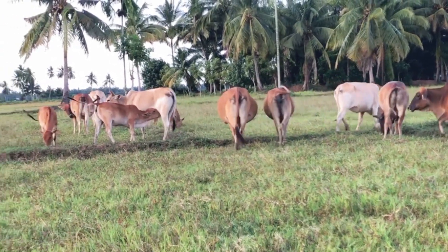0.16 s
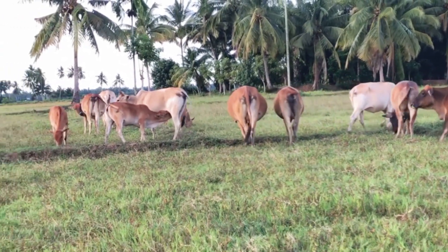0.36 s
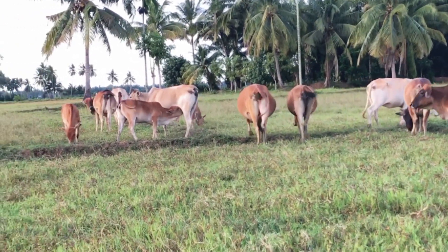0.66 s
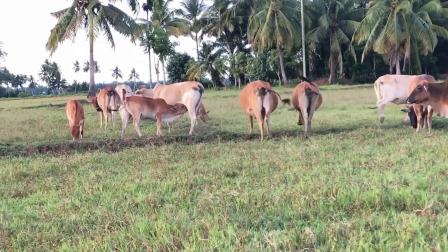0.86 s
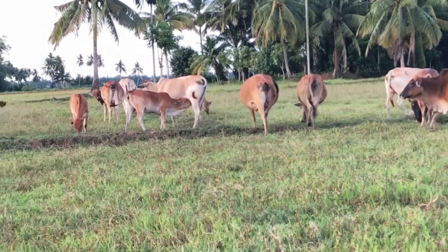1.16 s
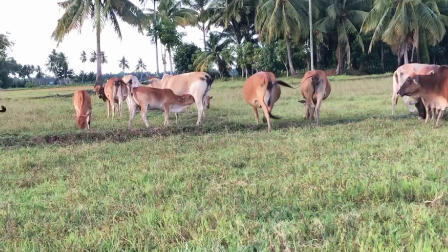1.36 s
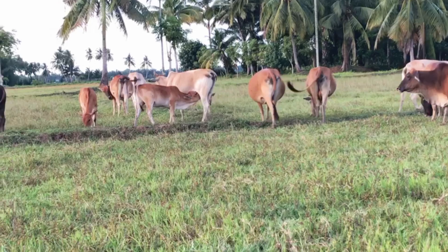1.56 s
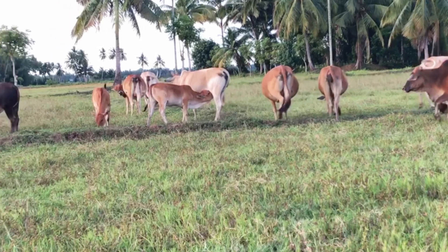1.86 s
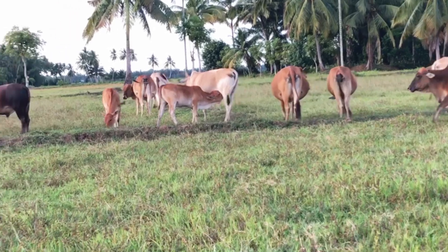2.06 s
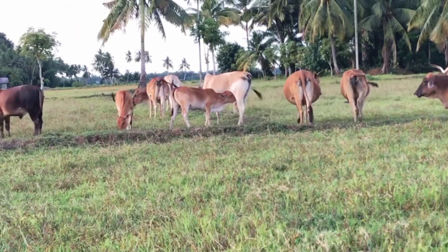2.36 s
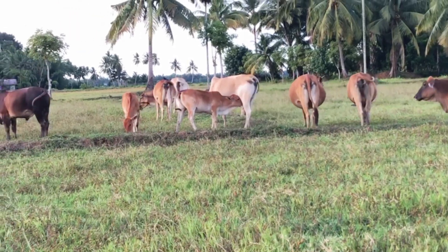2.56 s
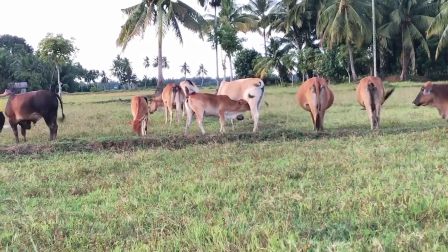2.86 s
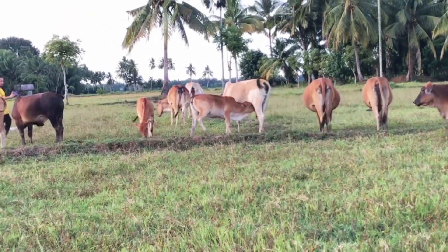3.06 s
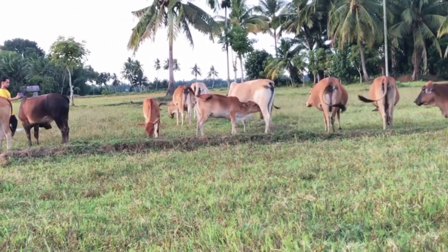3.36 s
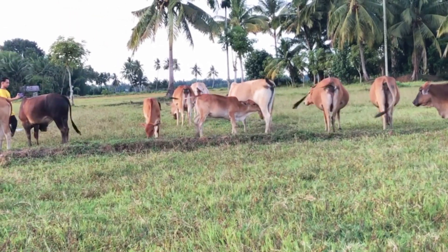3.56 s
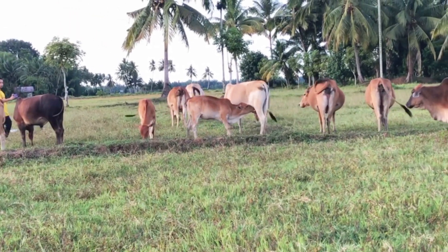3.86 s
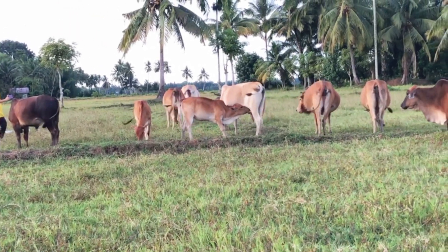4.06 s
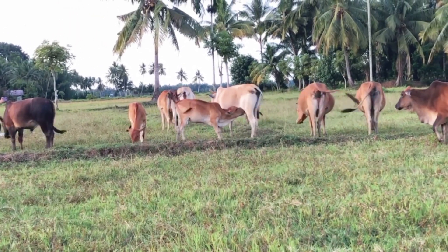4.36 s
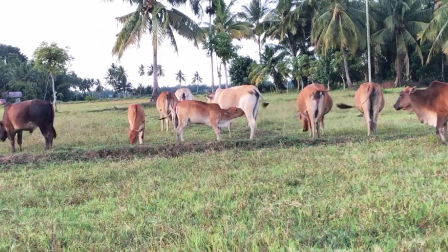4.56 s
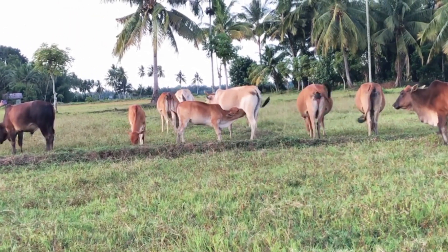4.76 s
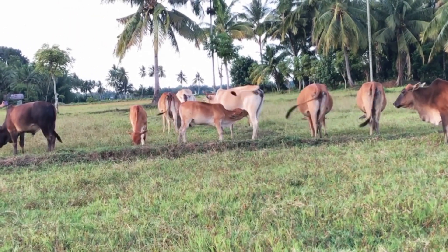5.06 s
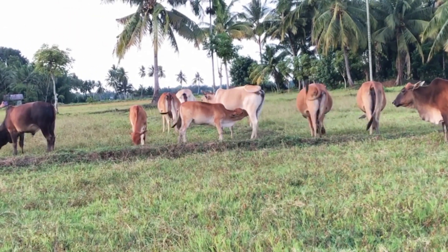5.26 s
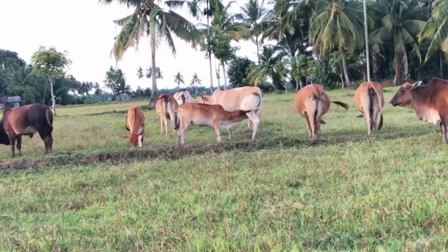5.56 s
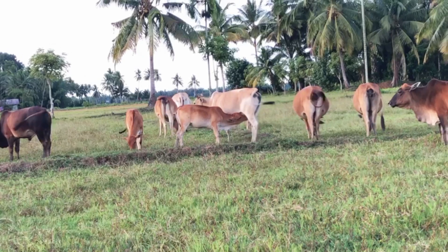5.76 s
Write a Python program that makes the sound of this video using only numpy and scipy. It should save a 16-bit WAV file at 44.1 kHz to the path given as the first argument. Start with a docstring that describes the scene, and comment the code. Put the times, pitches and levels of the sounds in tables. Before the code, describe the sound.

Outdoors, two calf bawls frame a low ragged cow moo, with wind thumping the microphone and bright birds chirping rapidly near the end.

```python
"""Cattle on an open pasture: a rough moo dies away, a calf bawls twice and a cow answers between the calls.
Each call is a train of vocal-fold pulses ringing the throat; it turns hoarse as the pitch sags, and a tail of
fading noise echoes it. A short low comes from far off. A far bird repeats a warble; other notes, faint and far
or loud and close, are whistles, trills and buzzes, all made of gliding sines. Filtered noise and clicks make
the wind that buffets the microphone, over a soft hiss of filtered noise."""
import sys
import numpy as np
from scipy import signal
from scipy.fft import rfft, irfft
from scipy.io import wavfile
from scipy.ndimage import uniform_filter1d, map_coordinates

SR = 44100
rng = np.random.default_rng(int(sys.argv[2]) if len(sys.argv) > 2 else 0)


def store_pcm(level_fs):
    """Save levels as 16-bit WAV."""
    pcm = np.round(np.clip(level_fs, -1, 1) * 32767).astype(np.int16)
    wavfile.write(sys.argv[1], SR, np.atleast_2d(pcm).T)


N = 260190
T = np.arange(N) / SR  # time in s
FREQS = np.arange(N + 1) * SR / (2 * N)  # filter frequencies in Hz


def undb(db):
    """Turn decibels into gain."""
    return 10 ** (np.asarray(db) / 20)


def curves(table):
    """Turn a table into curves over time: the first column is the time, each other column a curve."""
    seconds, *columns = np.transpose(table)
    return [np.interp(T, seconds, column) for column in columns]


def unit(x):
    """Scale to an rms (average strength) of 1."""
    return x / np.sqrt(np.mean(x ** 2))


def steady(x, seconds=0.023):
    """Even out the loudness by holding the running rms near 1."""
    running_power = np.abs(uniform_filter1d(x ** 2, int(seconds * SR)))
    return x / np.sqrt(running_power + 1e-6 * np.mean(x ** 2))


def ease(share):
    """A smooth step from 0 to 1."""
    return np.sin(np.pi / 2 * np.clip(share, 0, 1)) ** 2


def gate(start, end, edge):
    """Open from start to end (s), with soft edges."""
    opening = np.clip((T - start) / edge + .5, 0, 1)
    closing = np.clip((end - T) / edge + .5, 0, 1)
    return opening * closing


def walk(rate):
    """Random wandering with a spread near 1, drawn as straight lines between `rate` random points per second."""
    knots = rng.standard_normal(int(N / SR * rate) + 2)
    return np.sqrt(3 / 2) * np.interp(T * rate, np.arange(len(knots)), knots)


def filtered(x, response):
    """Apply a frequency response."""
    return irfft(rfft(x, 2 * N) * response)[:N]


def colour(points):
    """A filter through (Hz, dB) points that rings only after its input, never before."""
    hz, db = np.transpose(points)
    gain = undb(np.interp(np.log(FREQS + 1), np.log(hz), db))
    # folding the cepstrum gives the minimum-phase filter
    cepstrum = irfft(np.log(gain))
    cepstrum[1:N] *= 2
    return np.exp(rfft(cepstrum[:N], 2 * N))


def clicks(times, sizes):
    """Very short clicks placed exactly, even between samples, by a windowed sinc."""
    out = np.zeros(N)
    at = np.asarray(times)[:, None] * SR
    taps = np.floor(at).astype(int) + np.arange(-7, 9)
    shape = np.sinc(taps - at) * np.sinc((taps - at) / 8)
    np.add.at(out, np.clip(taps, 0, N - 1), sizes[:, None] * shape)
    return out


def air(low_share=0.067):
    """Soft hiss, made of filtered noise."""
    # tone of the hiss: pitch_hz, level_db
    air_tone = [(900, 0.5), (1400, -2.5), (2200, -2.5), (2900, -2.5), (3300, -6.5), (6400, -12.5),
                (9400, -14), (11300, -19), (12400, -24), (16000, -23)]
    # hiss level above 10.5 kHz over time: time_s, level_db (over its usual level)
    top_level = [(0, -6), (0.3, 13), (0.7, 1.5), (2.8, 2), (3.27, 11), (3.55, 5.5), (5.9, 2.5)]
    hiss = unit(filtered(rng.standard_normal(N), colour(air_tone)))
    top = filtered(hiss, 1 / (1 + (10500 / (FREQS + 1)) ** 8))  # above 10.5 kHz
    top_db = curves(top_level)[0]
    flicker = undb(-57 + 1.1 * walk(22))
    # the rest of the hiss follows only a small share of the level of the top
    return flicker * ((hiss - top) * undb(low_share * top_db) + top * undb(top_db))


def wind(scatter_db=2.6, flicker_db=2.0, crisp_hz=500, rumble_db=-3, rumble_hz=170):
    """Eddies slap the microphone: rumble and a patter of thumps swell in gusts, with some crisper slaps."""
    # tone of a thump: pitch_hz, level_db
    thump_tone = [(15, -106), (25, -45), (40, -9), (70, 0.5), (160, 1), (204, -0.5), (241, -2.5),
                  (361, -7.5), (401, -8.5), (557, -16), (900, -32), (1170, -68), (1980, -120)]
    # strongest slaps: time_s, peak_db
    slap_table = [(0.11, -28), (0.59, -19), (0.644, -18), (0.926, -32), (0.962, -30.5), (1.054, -31),
                  (1.124, -25.5), (1.255, -27), (1.464, -25), (1.553, -24.5), (2.911, -30.5),
                  (3.121, -27.5), (3.41, -30), (3.729, -27.5), (3.912, -33.5), (4.045, -26.5),
                  (5.404, -26.5), (5.514, -25), (5.74, -32)]
    # steady wind, easing after two seconds: time_s, level_db (before the flicker)
    breeze_table = [(0, -31), (0.7, -35), (1.2, -38), (1.85, -32.5), (2.15, -41.5), (2.5, -38.5),
                    (2.75, -42.5), (3.9, -41.5), (4.8, -42.5), (5.9, -41)]
    # short gusts: middle_s, level_db
    gust_table = [(0.64, -31.5), (0.85, -31.5), (1.41, -33.5), (1.712, -35.5), (3.41, -38), (3.74, -41.5),
                  (4.42, -37), (4.64, -33), (5.0, -35.5), (5.43, -35.5), (5.76, -34.5)]
    gust_s = 0.025  # half the length of a gust

    response = colour(list(thump_tone) + [(2500, -82), (8000, -100)])
    places, signs, chances = rng.random((800, 3)).T
    sizes = np.sign(signs - .5) * undb(scatter_db * np.minimum(-np.log(chances), 4))
    patter = unit(filtered(clicks(places * N / SR, sizes), response))
    rumble = unit(filtered(rng.standard_normal(N), response / (1 + (FREQS / rumble_hz) ** 2)))

    times, peak_db = np.transpose(slap_table)
    crisp = response * (1 + 1j * FREQS / crisp_hz)  # lifts the treble
    slaps = filtered(clicks(times, undb(peak_db)), crisp) / np.abs(irfft(crisp)).max()

    breeze = undb(curves(breeze_table)[0] + flicker_db * walk(22))
    gusts = sum(undb(db) * np.exp(-((T - middle) / gust_s) ** 2 / 2) for middle, db in gust_table)
    strength = np.hypot(breeze, gusts)
    return steady(patter + undb(rumble_db) * rumble, seconds=.1) * strength + slaps


def far_bird(waver=0.0122):
    """One dipping, rising whistle phrase, repeated softly: a sine with an unsteady pitch."""
    # the phrase: time_s (from its start), pitch_hz, level_db (added to that of the repeat)
    phrase = [(0, 2125, -9), (0.022, 2420, 0), (0.075, 2120, 0), (0.106, 2280, -4.5), (0.128, 2780, 2),
              (0.165, 3210, 1)]
    # its repeats: start_s, level_db
    repeats = [(1.087, -59.5), (1.349, -57.5)]
    out = np.zeros(N)
    for start, db in repeats:
        hz, shape_db = curves([(start + s, f, d) for s, f, d in phrase])
        phase = 2 * np.pi * np.cumsum(hz * (1 + waver * walk(200))) / SR
        out += undb(db + shape_db) * unit(np.sin(phase)) * gate(start, start + phrase[-1][0], .01)
    return out


def bird_notes(edge=0.0035, overtone_db=-44):
    """Whistled glides, faint or loud; in trills and buzzes the pitch sweeps unevenly and the tone pulses."""
    # plain whistles: start_s, length_s, first_hz, middle_hz, last_hz, level_db
    whistles = [ (0.88, 0.068, 2540, 2280, 2600, -61), (0.952, 0.063, 3650, 3000, 2260, -62),
                (1.51, 0.14, 2050, 2060, 2130, -62.5), (3.77, 0.018, 2990, 2730, 2500, -56),
                (3.838, 0.061, 2435, 2850, 3160, -61), (4.047, 0.026, 3870, 3800, 3700, -47),
                (4.067, 0.022, 3700, 3640, 3450, -33), (4.166, 0.028, 5450, 4025, 3890, -28),
                (4.377, 0.012, 2770, 3280, 3400, -33.5), (4.467, 0.063, 3170, 2710, 2690, -26),
                (5.055, 0.047, 2570, 2925, 3020, -29.5), (5.198, 0.13, 800, 772, 756, -54),
                (5.314, 0.019, 4050, 4130, 4770, -34), (5.351, 0.018, 3550, 3650, 3580, -30.5),
                (5.411, 0.029, 4250, 3770, 2620, -33), (5.439, 0.0256, 2820, 2370, 2080, -36.5),
                (5.492, 0.07, 1680, 2320, 1930, -47), (5.532, 0.045, 4480, 4070, 3380, -51.5),
                (5.558, 0.051, 2720, 2636, 2830, -31.5)]
    # trills: start_s, length_s, first_hz, middle_hz, last_hz, level_db, sweeps_per_s, depth_hz
    trills = [ (3.114, 0.11, 5760, 6030, 5870, -61, 99, 200),
              (4.087, 0.08, 3630, 5280, 5000, -30.5, 105, 243),
              (4.277, 0.043, 3530, 3700, 3695, -28.5, 210, 300),
              (4.39, 0.0415, 2900, 2990, 3020, -27.5, 58.5, 383),
              (4.424, 0.056, 3006, 3010, 3060, -26.5, 68, 302),
              (4.659, 0.06, 2930, 2755, 2730, -27.5, 122, 91),
              (5.329, 0.028, 4100, 3810, 3540, -33.5, 96, 714),
              (5.6, 0.045, 2960, 3085, 2740, -31.5, 86, 100)]
    # buzzes, too fast to hear the sweeps: start_s, length_s, first_hz, last_hz, level_db, depth_hz
    buzzes = [ (4.577, 0.013, 3840, 5270, -31.5, 1010), (4.738, 0.019, 4000, 5080, -36, 700),
              (4.823, 0.026, 4780, 5480, -35, 430), (4.843, 0.032, 4870, 4660, -35.5, 480),
              (5.106, 0.059, 4060, 3960, -32.5, 327), (5.116, 0.06, 5850, 5570, -49, 250),
              (5.235, 0.04, 3770, 4420, -34.5, 1130)]
    buzz_hz = 328  # average sweeps per s in a buzz

    waver = .006 * walk(300)  # of the pitch
    haste = .16 * walk(200)  # of the sweep speed
    flutter = undb(1.8 * walk(220))  # of the loudness
    reach = 1 + .25 * walk(350)  # of the sweep depth

    def note(start, length, glide_hz, db, trill_hz=0, depth_hz=0):
        """One note gliding smoothly through the given pitches."""
        t = np.arange(int(length * SR)) / SR
        span = slice(int(start * SR), int(start * SR) + len(t))
        swing = 2 * np.pi * trill_hz * np.cumsum(1 + haste[span]) / SR
        places = np.linspace(0, 1, len(glide_hz))
        glide = np.polyval(np.polyfit(places, glide_hz, len(glide_hz) - 1), t / length)
        sweep = np.sin(swing) + 0.37 * np.sin(2 * swing)  # lopsided: slow one way, quick the other
        hz = glide * (1 + waver[span]) - depth_hz * reach[span] * sweep
        phase = 2 * np.pi * np.cumsum(hz) / SR
        tone = np.sin(phase) + undb(overtone_db) * np.sin(2 * phase)
        pulsing = min(depth_hz / 600, .6)  # deeper sweeps pulse more
        shape = ease(np.minimum(t, length - t) / edge) * flutter[span] * (1 - pulsing * np.cos(swing))
        out = np.zeros(N)
        out[span] = undb(db) * unit(shape * tone)
        return out

    plain = sum(note(s, length, hz, db) for s, length, *hz, db in whistles)
    trilled = sum(note(s, length, hz, db, rate, depth) for s, length, *hz, db, rate, depth in trills)
    buzzed = sum(note(s, length, hz, db, buzz_hz, depth) for s, length, *hz, db, depth in buzzes)
    return plain + trilled + buzzed


def pasture(x, wet_db, t60):
    """Weak scatter from the ground and the trees: a noise tail that falls by 60 dB in t60 seconds."""
    tail = rng.standard_normal(N) * undb(-60 * T / t60) * (T > .008)
    echo = filtered(x, rfft(tail / np.sqrt(np.sum(tail ** 2)), 2 * N))
    return x + undb(wet_db) * echo


def throat(modes, skirt=1.533, top_hz=9500):
    """Response of a throat: the power of its resonances added up, falling off above top_hz."""
    hz = np.geomspace(20, SR / 2, num=1500)
    power = 0
    for f, width, db in modes:
        offset = (hz ** 2 - f ** 2) / (hz * width)
        power = power + undb(db) ** 2 / (1 + offset ** 2) ** skirt
    return colour(np.column_stack([hz, 10 * np.log10(power / (1 + (hz / top_hz) ** 10))]))


def hoarseness(hz, start):
    """Roughness 0-1: a voice starts rough, clears near its highest pitch and roughens as the folds slacken."""
    clear_rough, start_rough, start_fade_s = 0.12, 0.16, 0.16
    break_sag, break_power = 0.32, 1.78  # pitch share lost that adds 1 to roughness; the break comes late
    onset = np.exp(-np.maximum(T - start, 0) / start_fade_s)
    breaking = ((1 - hz / hz.max()) / break_sag) ** break_power
    return np.clip(clear_rough + breaking + start_rough * onset, 0, 1)


def glottis(hz, rough, jitter, shimmer_db, rasp, soft_hz=3000, hiss_db=0):
    """One snap of the vocal folds per cycle, unsettled by roughness; in the treble, turbulence takes over."""
    phase = np.cumsum(hz) / SR  # counted in cycles
    cycles = np.arange(1, int(phase[-1]))
    time_chance, size_chance = rng.standard_normal((1000, 2))[:len(cycles)].T
    unrest = np.interp(cycles, phase, rough)
    times = np.interp(cycles + jitter * unrest * time_chance, phase, T)
    snaps = unit(clicks(times, undb(shimmer_db * unrest * size_chance)))
    # breath noise bursts out at each cycle and dies down
    puffs = unit(np.exp(-(phase % 1)) * rng.standard_normal(N))
    soft = 1 / (1 + (FREQS / soft_hz) ** 16)  # share of the snaps at each frequency
    turbulence = filtered(puffs, np.sqrt(1 - soft)) * undb(hiss_db + 2 * walk(28))
    return filtered(snaps + rasp * rough * puffs, np.sqrt(soft)) + turbulence


def sliding(x, response, ratio):
    """Filter on a warped clock, so that all resonances move by the given ratio."""
    clock = np.cumsum(ratio)
    warped = map_coordinates(x, [np.interp(np.arange(N), clock, np.arange(N))], order=3)
    return map_coordinates(filtered(warped, response), [clock], order=3)


def moo(source, modes, split_hz, db, upper_db, slack, low_sag=0, high_sag=0, hold_s=0.0233):
    """The throat rings in a lower and an upper band, each with its own level; as slack drops they sink."""
    response = throat(modes)
    lower = 1 / (1 + (FREQS / split_hz) ** 16)
    body = sliding(source, response * lower, slack ** low_sag)
    bright = sliding(source, response * (1 - lower), slack ** high_sag)
    return undb(db) * steady(body, hold_s) + undb(upper_db) * steady(bright, hold_s)


def distant_low(flutter_db=3.2):
    """A short, fluttering far-off low: rough pulses at 86 Hz through a throat."""
    # loudness: time_s, level_db (before the flutter)
    low_levels = [(2.6, -48), (2.7, -41.5), (2.77, -39.5), (2.9, -51), (3.0, -66)]
    # throat resonances: pitch_hz, width_hz, level_db (relative)
    low_throat = [(854, 180, -8), (1283, 100, -7), (1759, 220, -19.5), (5280, 850, -30.5)]
    source = glottis(np.full(N, 86.), np.full(N, .8), jitter=.1, shimmer_db=3, rasp=1.5)
    db = curves(low_levels)[0] + flutter_db * walk(45)
    return steady(filtered(source, throat(low_throat, skirt=2.0))) * undb(db) * gate(2.61, 2.98, 0.061)


def fading_moo():
    """The last hoarse rattle of a call and its dying ring: very uneven pulses at 72 Hz."""
    # loudness before the trims below: time_s, lower_resonances_db, upper_resonances_db
    fading_levels = [(0.0, -28.5, -24.5), (0.032, -29.5, -28), (0.072, -37, -39), (0.11, -30.5, -38),
                     (0.154, -33.5, -36), (0.3, -35.5, -40.5)]
    # throat resonances: pitch_hz, width_hz, level_db (relative)
    fading_throat = [(373, 260, -1.5), (846, 220, -5), (1448, 94, 1.5), (1796, 49, -5), (2770, 630, -18),
                     (3550, 420, -16.5), (6040, 1100, -36)]
    db, upper_db = curves(fading_levels)
    source = glottis(np.full(N, 72.), np.full(N, .8), jitter=.15, shimmer_db=4, rasp=1.0, hiss_db=-3)
    voice = moo(source, fading_throat, 930, db + 2.0, upper_db + .5, np.ones(N))
    return voice * gate(-1, 0.38, 0.13)


def cow(edge_s=0.017, linger_s=0.0043, rasp=1.0, jitter=0.034):
    """A deep moo, ragged at both ends, where the folds are slackest."""
    # course of the call: time_s, pitch_hz, lower_resonances_db, upper_resonances_db
    call = [(1.65, 73.37, -24.5, -32), (1.71, 76.1, -28.5, -40), (1.745, 88.77, -24.5, -32.5),
            (1.829, 87.6, -24, -32), (1.99, 94.03, -29, -35.5), (2.079, 93.57, -25.5, -34.5),
            (2.347, 90.12, -22.5, -35), (2.43, 85.77, -20.5, -34.5), (2.505, 80.5, -24.5, -34),
            (2.58, 68.55, -21, -38.5)]
    # throat resonances at the highest pitch: pitch_hz, width_hz, level_db (relative)
    cow_throat = [(256.6, 66, -14), (528.6, 36, 1), (819, 146, -16), (962, 44, -14.5), (1422, 91, -12.5),
                  (1691, 60, 1), (1821, 102, 2), (2252, 190, -10), (3140, 1050, -29.5), (5800, 5000, -40),
                  (8300, 2000, -53)]
    hz, db, upper_db = curves(call)
    start, end = call[0][0], call[-1][0]
    source = glottis(hz, hoarseness(hz, start), jitter=jitter, shimmer_db=3.0, rasp=rasp, soft_hz=2460)
    voice = moo(source, cow_throat, 1360, db, upper_db, hz / hz.max(), low_sag=0.043, high_sag=0.049)
    return voice * gate(start, end + linger_s, edge_s)


def calf(start, crest, end, top_hz, db, upper_db):
    """A nasal bawl: its pitch arches, then sags; it swells when a harmonic meets a throat resonance."""
    # throat resonances, mouth open at the highest pitch: pitch_hz, width_hz, level_db (relative)
    calf_throat = [(455, 169, -11), (980, 310, -16), (1212, 65, 1.5), (1868, 99, 1.5), (1990, 71, -0.5),
                   (2193, 88, 4), (2966, 175, -10.5), (3605, 400, -15.5), (4300, 500, -30.5),
                   (8320, 450, -32)]
    rise, sag, sag_power = 0.06, 0.275, 1.8  # shares of the pitch; the sag comes late
    waver = 0.002435  # unsteadiness as a share of the pitch
    mouth_open_s, mouth_close_s = 0.11, 0.07
    # a shut mouth is quieter and its resonances sink
    shut_lower_db, shut_upper_db, shut_sink = -1.5, -12, 0.086

    climb = np.clip((T - start) / (crest - start), 0, 1)
    fall = np.clip((T - crest) / (end - crest), 0, 1)
    arch = 1 - rise * (1 - ease(climb)) - sag * ease(fall ** sag_power)
    mouth = np.minimum((T - start) / mouth_open_s, (end - T) / mouth_close_s)
    shut = 1 - np.clip(mouth, 0, 1)

    hz = top_hz * arch * (1 + waver * walk(30))
    source = glottis(hz, hoarseness(arch, start), jitter=.03, shimmer_db=5.5, rasp=1.0, soft_hz=3980)
    slack = arch ** 0.19 * (1 - shut_sink * shut)
    # the long hold lets the loudness swell within the call
    voice = moo(source, calf_throat, 1306, db + shut_lower_db * shut, upper_db + shut_upper_db * shut, slack,
                low_sag=1.0, high_sag=0.49, hold_s=0.3)
    return voice * gate(start, end, 0.015)


def scene():
    """Herd, birds, wind and hiss together, with echoes on the animals."""
    # calf bawls, mouth open:
    # start_s, highest_at_s, end_s, highest_pitch_hz, lower_resonances_db, upper_resonances_db
    bawls = [(0.17, 0.47, 0.88, 134.2, -35.5, -30), (4.464, 4.774, 5.165, 133.6, -32.5, -26)]
    calves = sum(calf(*bawl) for bawl in bawls)
    cows = cow() + fading_moo() + distant_low()
    herd = pasture(calves, wet_db=-16, t60=.18) + pasture(cows, wet_db=-14, t60=.35)
    birds = pasture(bird_notes() + far_bird(), wet_db=-12.0, t60=0.18)
    return (herd + birds + wind() + air())[None]


def record(dry):
    """A steep low-pass filter cuts the treble above 15750 Hz."""
    return signal.sosfilt(signal.ellip(10, .2, 80, 15750, fs=SR, output="sos"), dry)


dry = scene()
out = record(dry)
store_pcm(out)
```